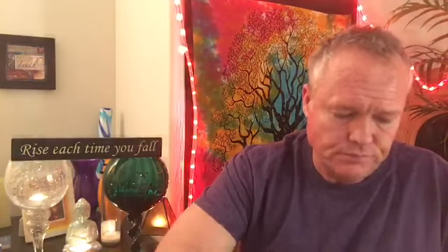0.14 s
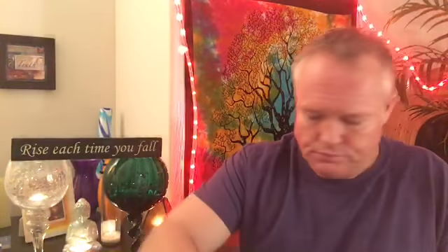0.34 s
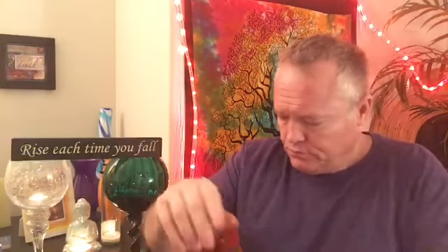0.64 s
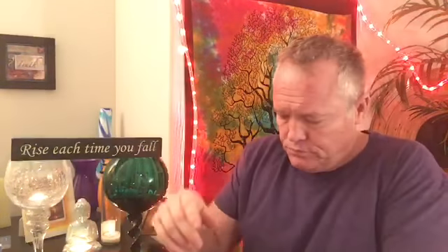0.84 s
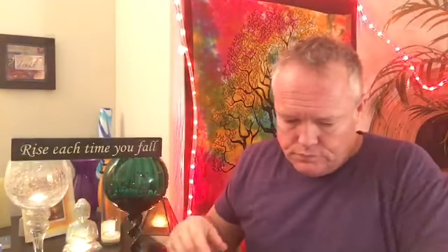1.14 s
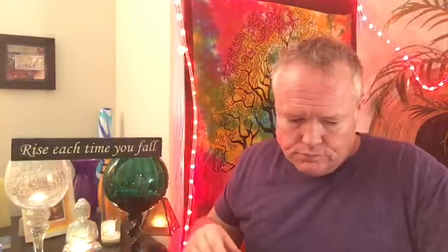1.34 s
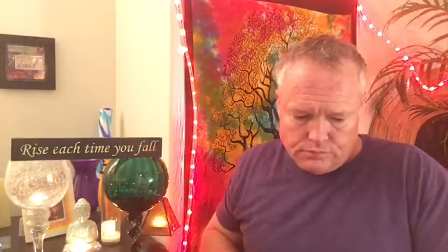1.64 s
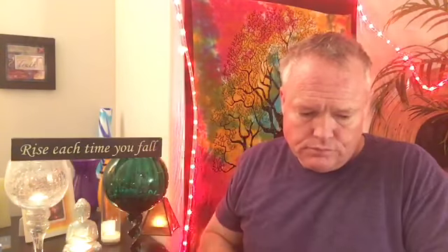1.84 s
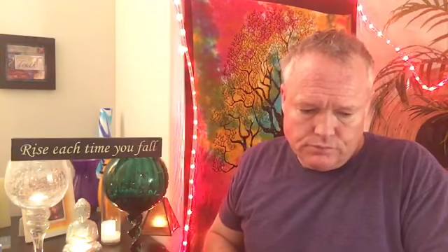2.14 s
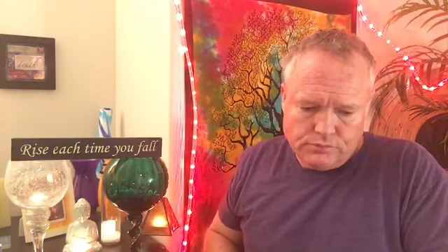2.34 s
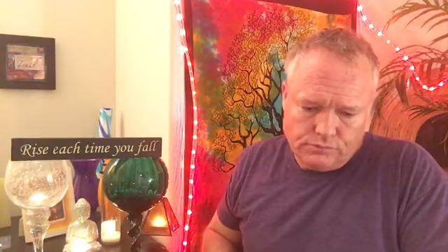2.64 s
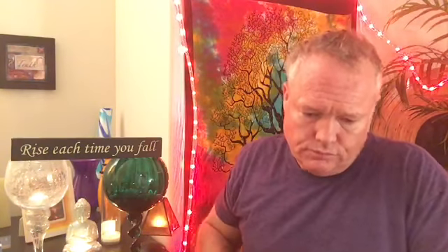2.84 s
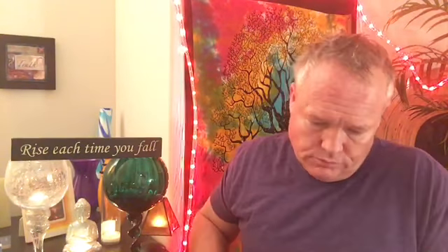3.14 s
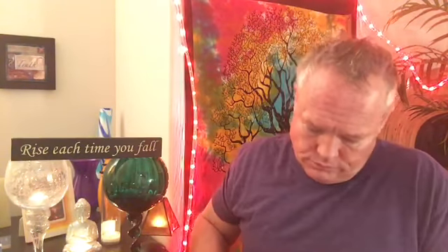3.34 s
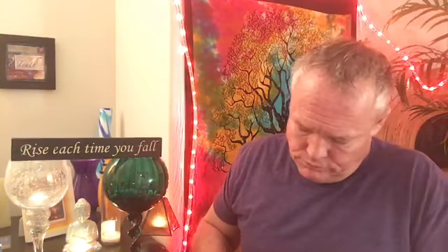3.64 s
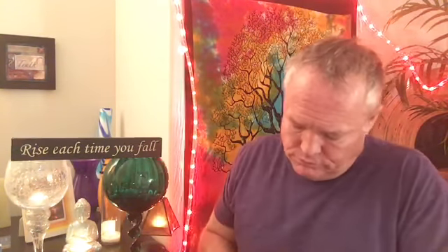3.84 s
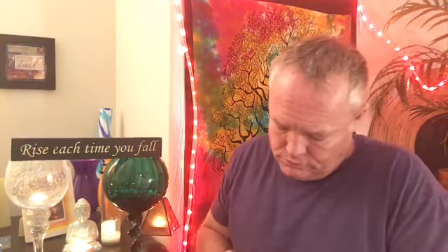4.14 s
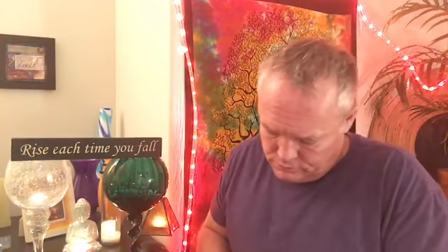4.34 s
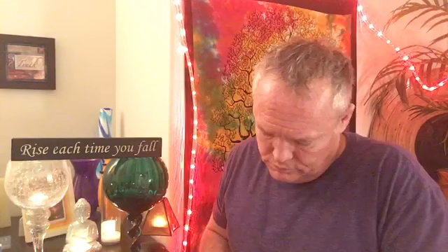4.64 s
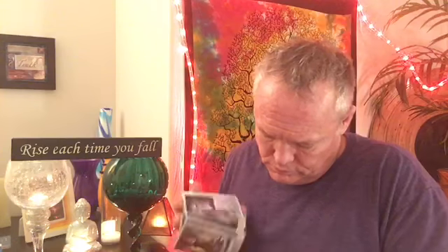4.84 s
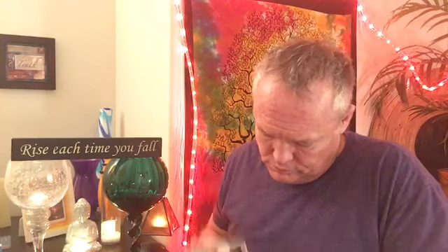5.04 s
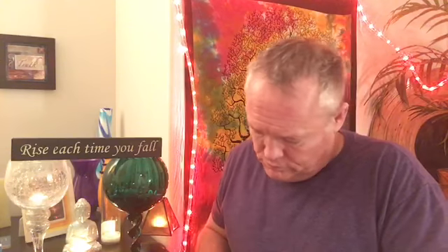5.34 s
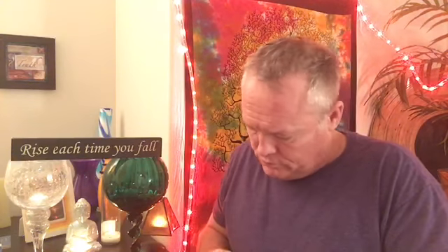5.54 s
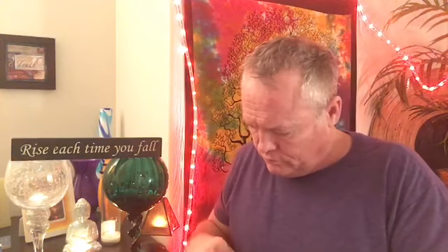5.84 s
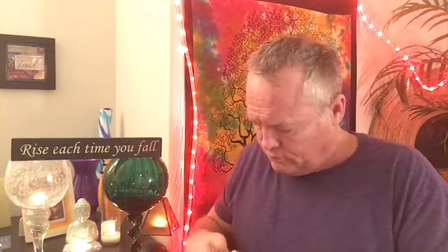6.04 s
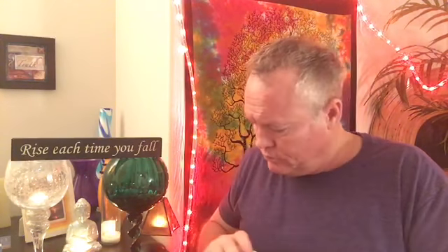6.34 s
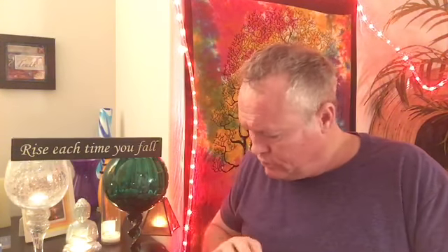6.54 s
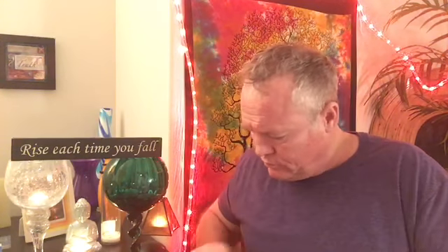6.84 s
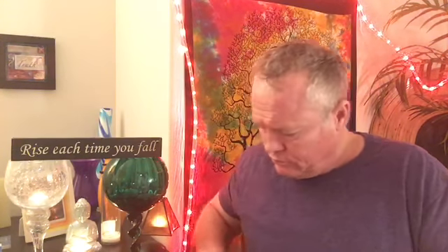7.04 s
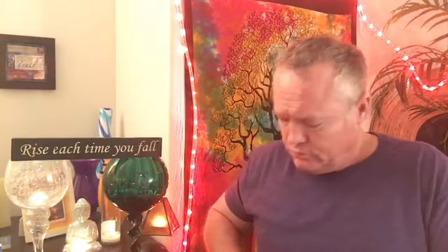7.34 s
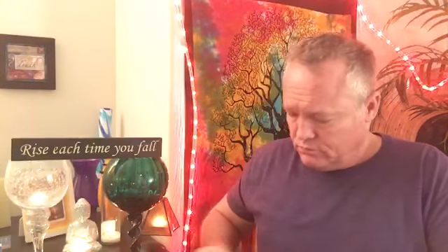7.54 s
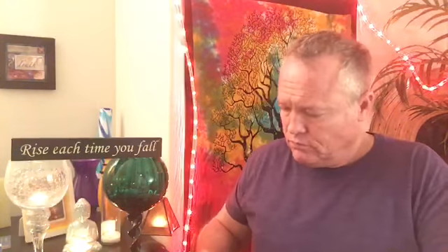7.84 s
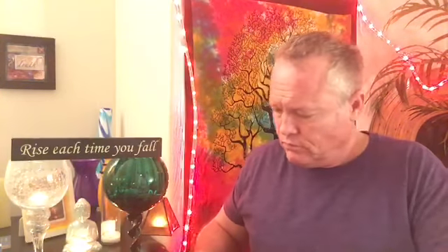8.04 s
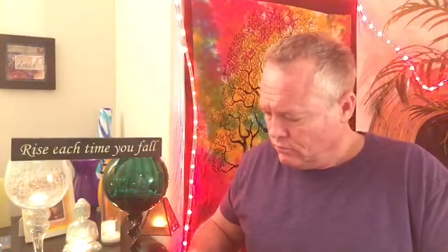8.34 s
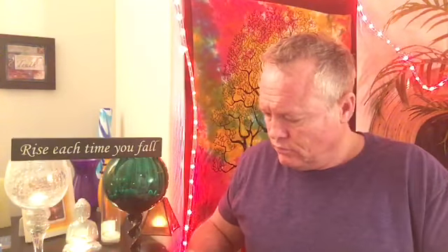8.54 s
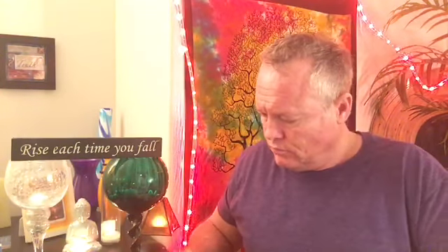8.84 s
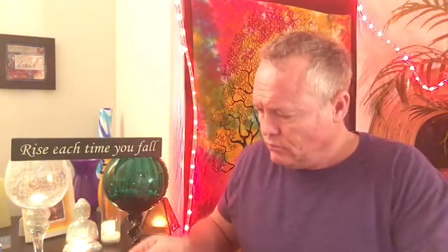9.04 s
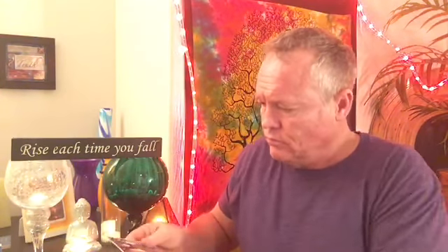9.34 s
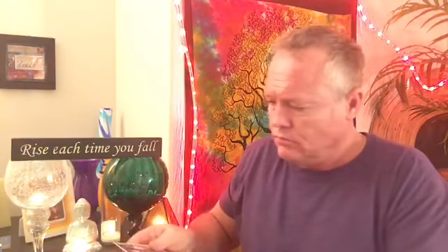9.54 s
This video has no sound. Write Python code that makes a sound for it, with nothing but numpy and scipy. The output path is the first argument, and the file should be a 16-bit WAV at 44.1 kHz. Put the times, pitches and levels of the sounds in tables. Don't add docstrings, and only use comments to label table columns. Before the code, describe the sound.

A man's hands work a card deck: quiet rubbing, one loud slap, a snappy flurry of flips, lighter taps, then near stillness.

```python
import sys
import numpy as np
from scipy import signal
from scipy.io import wavfile
from scipy.ndimage import uniform_filter1d

SR = 44100
rng = np.random.default_rng(int(sys.argv[2]) if len(sys.argv) > 2 else 0)


def ratio_of_db(decibels):
    return 10 ** (np.asarray(decibels, float) / 20)


def store_wav(level_fs):
    pcm = np.round(np.clip(np.atleast_2d(level_fs), -1, 1) * 32767)
    wavfile.write(sys.argv[1], SR, pcm.T.astype(np.int16))


N = 427302

# (time [s], peak level [dB], body share [dB])
SNAPS = [(5.841, -38, 7), (2.2623, -34, -24), (2.3593, -30.5, 4), (3.696, -27, 6), (1.98, -31.5, 4),
         (4.9655, -29, 11), (7.481, -29.5, 5), (7.918, -30, -10), (8.096, -44, -13), (8.129, -33, -2),
         (8.243, -29.5, -2)]
SNAP_S, SNAP_EDGE_DB, SNAP_SHEEN_DB = 0.00095, -14, -32
# (time [s], peak level [dB], body share [dB], edge share [dB], length [s])
SLAPS = [(1.645, -27.5, 5, -32, 0.005), (1.65, -28, 8, -30, .003), (2.9618, -16.5, -3, -34, 0.01),
         (2.9700, -2.5, -7.5, -23, 0.0043), (2.9735, -11, -7, -10, 0.009), (2.983, -12, -9, -20, 0.0023),
         (3.382, -29, 16, -24, .003), (3.399, -21, -5, -36, 0.0048), (3.4008, -8.5, -4, -26, 0.0026),
         (3.4042, -11.5, -8, -20, .0015), (7.892, -24, -11, -38, 0.00072)]
SLAP_SHEEN_DB = -54
# (time [s], peak level [dB], body share [dB], edge share [dB], length [s])
FLIPS = [
    (5.0035, -10.5, -2, -18, 0.0016),
    (5.035, -16.5, 10, -24, .0015),
    (5.045, -9.5, 6, -32, 0.002),
    (5.083, -30, -6, -22, .001),
    (5.086, -9.5, -3, -36, 0.00063),
    (5.123, -13, -2, -22, 0.0013),
    (5.135, -17, -3, -27, 0.0017),
    (5.147, -23, -20, -18, 0.0026),
    (7.535, -27, -1, -6, 0.0046),
    (7.549, -12.5, -7.5, -21, 0.0039),
]
FLIP_SHEEN_DB = -29.5
# (frequency [Hz], level per Hz [dB])
CARD = [(250, -39.5), (600, 7.5), (1200, -2.5), (1700, -3), (2300, 3), (2650, 6), (3150, 2), (4200, -10.5),
        (6200, -25),
        (7600, -32), (8700, -26), (10500, -40), (12000, -38), (15600, -45)]
# (start [s], length [s], first level [dB], last level [dB], body share [dB])
RIFFLES = [
    (1.548, .097, -41, -38, -9),
    (5.01, .045, -21, -24, 5.5),
    (5.06, 0.08, -21, -43, 0),
    (5.14, 0.06, -35, -56, -18),
    (7.527, 0.0284, -34, -19.5, -11),
]
RIFFLE_EDGE_DB, RIFFLE_SHEEN_DB = -23, -27
# (time [s], peak level [dB], favoured pitch [Hz], rise [s])
THUMPS = [(0.348, -28.5, 286, 0.012), (0.989, -25, 156, 0.0067), (1.021, -23.5, 254, 0.011),
          (1.05, -37, 140, 0.008), (1.096, -22.5, 269, 0.0054), (1.26, -31.5, 143, 0.0071),
          (1.396, -28.5, 148, 0.012), (1.651, -18.5, 228, 0.0061), (2.693, -29.5, 219, 0.05),
          (2.797, -28, 210, 0.029), (2.976, -4.5, 151, 0.0067), (3.168, -27, 153, 0.0045),
          (3.385, -16, 217, 0.0056), (3.401, -10, 164, 0.011), (3.429, -10, 152, 0.0019),
          (3.69, -23, 252, 0.033), (4.964, -28.5, 227, 0.0066), (5.009, -16, 243, 0.008),
          (5.087, -10, 223, 0.0022), (5.11, -12, 160, 0.0036), (5.216, -22.5, 172, 0.0074),
          (7.374, -25, 163, 0.024), (7.491, -24.5, 158, 0.0033), (7.551, -16, 360, 0.0027),
          (7.892, -23.5, 229, 0.041), (8.088, -24.5, 213, 0.015), (8.146, -20.5, 214, 0.049),
          (8.777, -33, 231, 0.008)]
# (time [s], peak level [dB], favoured pitch [Hz], rise [s])
KNOCKS = [
    (1.654, -29.5, 474, 0.0028),
    (2.972, -5.5, 554, .004),
    (2.987, -13.5, 480, 0.0072),
    (3.403, -9.5, 545, 0.0037),
    (3.693, -20, 460, 0.0031),
    (5.087, -12, 700, 0.0016),
    (7.553, -19, 760, 0.0017),
]
# (frequency [Hz], level [dB], t60 [s])
TABLE = [(96.5, -11.5, 0.42), (151.7, -1.5, 0.19), (204.7, 0.5, 0.11), (246.5, -3, 0.097), (295, -2.5, .12),
         (368.2, -3, 0.1), (462.2, -2, 0.077), (522.5, -4, 0.073), (611.7, -13.5, 0.19), (700, -16.5, 0.12),
         (772.4, -8.5, 0.14)]
# (start [s], length [s], hiss level [dB], rumble level through the table [dB])
RUBS = [(0.883, .2, -47.5, -43.5), (1.096, 0.46, -43.5, -48.5), (1.57, 0.133, -40, -42),
        (1.717, 0.07, -43, -48), (1.83, 0.6, -40.5, -66), (2.544, 0.027, -42.5, -66),
        (2.655, 0.18, -53, -55), (3.749, 0.29, -42.5, -44), (4.887, 0.16, -45, -60),
        (5.31, 0.27, -41.5, -54), (5.584, 0.12, -42, -47), (5.697, 0.26, -46, -49.5),
        (5.966, 0.31, -48, -49.5), (7.213, 0.24, -47, -45.5), (7.45, 0.093, -44, -56),
        (7.684, .15, -49, -41), (7.853, 0.17, -48, -43), (8.058, 0.088, -42, -44), (8.24, .04, -42, -58)]
STROKE_EDGES, STROKE_SAG_DB = 0.19, 0.5
# (time [s], peak level [dB], frequency [Hz], length [s])
PIPS = [(0.25, -37.5, 700, 0.012), (0.259, -42, 1420, 0.0069), (.632, -41, 1620, 0.012),
        (1.016, -41, 787, 0.023), (1.338, -46, 950, 0.0077), (2.361, -27.5, 1030, 0.0026),
        (2.9705, -12, 3210, 0.0038), (2.976, -12, 3450, 0.0072), (3.403, -28, 3930, 0.0076),
        (5.015, -16.5, 1109, 0.026), (5.039, -13, 1364, 0.013), (5.404, -44, 710, 0.0089),
        (5.659, -38.5, 688, 0.016), (6.105, -37.5, 1414, 0.0091), (6.464, -42, 606, .015),
        (7.317, -34.5, 590, 0.0084), (7.552, -17.5, 1432, 0.0084), (7.554, -19.5, 1173, .007),
        (7.553, -24.5, 703, 0.01), (7.55, -18, 2860, 0.003), (3.404, -22.5, 1565, 0.011),
        (3.41, -21, 2460, 0.0144), (7.555, -22, 366, 0.011), (7.817, -43, 950, 0.018),
        (7.8933, -19, 3190, 0.0012), (7.893, -29, 1300, 0.0044), (7.985, -36.5, 1260, .004),
        (8.756, -47, 1484, .018), (9.392, -41, 1450, 0.01), (9.486, -29, 615, 0.007)]
# (time [s], peak level [dB], frequency [Hz])
FLICKS = [(.194, -31.5, 2150), (0.2934, -37, 2650), (0.419, -33.5, 2640), (.595, -38, 3020),
          (0.823, -38, 2730), (1.336, -37, 2250), (1.8422, -32, 2050), (1.943, -35.5, 2930),
          (2.0343, -35, 2900), (2.0812, -31, 2900), (2.391, -39, 2670), (3.5887, -32.5, 2500),
          (3.9, -36, 2630), (5.619, -35, 2900), (6.185, -34.5, 2230), (6.4443, -37, 2280),
          (7.892, -24, 2320), (8.736, -37, 2290)]
FLICK_S, PIP_GLIDE = 0.0035, 0.069
# (time [s], room share [dB])
REACH = [(0, -4), (2.9, -0.5), (3.4, -2), (4.9, -4), (5.12, 0), (7.5, -5), (7.9, -0.5), (9.7, 0)]
# (frequency [Hz], t60 [s])
ROOM = [(100, 0.043), (260, 0.54), (700, 0.34), (1840, 0.31), (4850, 0.19)]
SHARP = .1555, .3, [1, 16, 20, 21, 22, 23, 27, 29, 31], [0, 7, 8, 10, 12, 14, 21.5, 24, 25, 26]
DULL = .1075, .1024, [0, 6, 26, 46, 50, 56, 58, 70, 82, 88], [2, 8, 11, 23, 40, 41, 43, 75.94, 78, 84, 90]
SHARP_DB, SHARP_RING_DB, DULL_DB, DULL_RING_DB, WEAK_DB = -41, 8.5, -41.5, 11, -4
# (frequency [Hz], width [Hz], level [dB])
FAN = [(54.6, 8.3, -57.5), (101.8, 13, -54.5), (233.2, 4.7, -51.5), (315.5, 23, -53.5), (355, 11.5, -59.5),
       (606, 51, -59), (2380, 300, -61.5), (2900, 320, -58.5)]
# (frequency [Hz], level per Hz [dB])
AIR = [(20, -27), (45, -10.5), (130, -4), (300, -4.5), (450, -10.5), (1250, -19.5), (2600, -17.5),
       (3400, -26), (4400, -33), (6600, -32.5), (9500, -40), (10500, -44.5), (11500, -42), (15700, -45.5)]
AIR_DB = -46
WHINE_GAPS = .50, .989
WHINE_HZ, WHINE_DB = 3450, -66


def evened(x):
    return x / np.sqrt(np.mean(x ** 2) + 1e-20)


def read(points, hz):
    f, value = np.transpose(points)
    return np.interp(np.log(hz + 1), np.log(f + 1), value)


def add(mix, s, sound):
    part = mix[round(s * SR):][:len(sound)]
    part += sound[:len(part)]


def band(x, lo_hz, hi_hz, order=2):
    return signal.sosfilt(signal.butter(order, [lo_hz, hi_hz], "band", fs=SR, output="sos"), x)


def resonate(x, hz, width):
    r = np.exp(-np.pi * width / SR)
    return signal.lfilter([1 - r], [1, -2 * r * np.cos(2 * np.pi * hz / SR), r * r], x)


def card_colour(drive, body_db, edge_db, sheen_db):
    level_db = np.maximum(read(CARD, abs(np.fft.fftfreq(2048, 1 / SR))), -100)
    log_gain = np.log(ratio_of_db(level_db))
    phase = -signal.hilbert(log_gain).imag
    taps = np.fft.ifft(np.exp(log_gain + 1j * phase)).real[:1024]
    x = signal.oaconvolve(drive, taps)[:len(drive)]
    body = evened(band(x, 650, 1880))
    crack = evened(band(x, 1650, 6000))
    edge = evened(band(x, 4600, 8160))
    sheen = evened(band(x, 8000, 19000, order=4))
    return crack - ratio_of_db(body_db) * body - ratio_of_db(edge_db) * edge + ratio_of_db(sheen_db) * sheen


def crackle(count, per_s, spread_db):
    sign_and_size = rng.standard_normal(count)
    uneven = ratio_of_db(spread_db * rng.exponential(1, count).clip(0, 4))
    return sign_and_size * uneven * (rng.random(count) < per_s / SR)


def snaps():
    near, far = np.zeros(N), np.zeros(N)
    t = np.arange(1600) / SR
    impulse = 1. * (t == 0)
    rows = [(s, db, body_db, length, edge_db, SLAP_SHEEN_DB) for s, db, body_db, edge_db, length in SLAPS]
    rows += [(s, db, body_db, length, edge_db, FLIP_SHEEN_DB) for s, db, body_db, edge_db, length in FLIPS]
    rows += [(*row, SNAP_S, SNAP_EDGE_DB, SNAP_SHEEN_DB) for row in SNAPS]
    noises = rng.standard_normal((len(rows), len(t)))
    for (s, db, body_db, length, edge_db, sheen_db), noise in zip(rows, noises):
        u = t / length
        burst = noise * np.exp(-u) * (1 - np.exp(-5.0 * u))
        crack = card_colour(burst, body_db, edge_db, sheen_db)
        size = ratio_of_db(db + 0.5) / abs(crack).max()
        add(near, s, size * crack)
        add(far, s, size * card_colour(impulse, body_db, edge_db, sheen_db))
    return near, far


def riffle():
    out, clicks = np.zeros(N), crackle(N, 3000, 2.1)
    for s, length, first_db, last_db, body_db in RIFFLES:
        count = round(length * SR)
        run = card_colour(clicks[round(s * SR):][:count], body_db, RIFFLE_EDGE_DB, RIFFLE_SHEEN_DB)
        swell = ratio_of_db(np.linspace(first_db, last_db, count) - 9.5)
        add(out, s, swell * run * signal.windows.tukey(count, .15))
    return out


def thumps():
    out, t = np.zeros(N), np.arange(SR // 3) / SR
    blows = THUMPS + KNOCKS
    hz, db, t60 = np.transpose(TABLE)[..., None]
    chance = rng.random((len(blows), 2, len(TABLE), 1))
    for (s, peak_db, spot_hz, rise), (detune, phase) in zip(blows, chance):
        near_db = -9.0 * abs(np.log2(hz / spot_hz))
        mode_hz = hz * (1 + 0.05 * (detune - .5))
        modes = ratio_of_db(db + near_db - 60 * t / t60) * np.sin(2 * np.pi * (mode_hz * t + phase))
        ring = modes.sum(0) * (1 - np.exp(-t / rise))
        add(out, s, ratio_of_db(peak_db - 4.5) * ring / abs(ring).max())
    return out


def rubs():
    clumps = ratio_of_db(3.5 * evened(uniform_filter1d(rng.standard_normal(N), 700)))
    grit = evened(clumps * crackle(N, 6000, 2.2))
    low = evened(sum(ratio_of_db(db) * evened(resonate(grit, hz, 2.0 / t60)) for hz, db, t60 in TABLE))
    hiss = card_colour(grit, -2, -40.0, -22)
    press = np.zeros((N, 2))
    for s, length, hiss_db, low_db in RUBS:
        count = round(length * SR)
        stroke = signal.windows.tukey(count, STROKE_EDGES) * ratio_of_db(np.linspace(0, STROKE_SAG_DB, count))
        add(press, s, stroke[:, None] * ratio_of_db([hiss_db - 15, low_db - 6.0]))
    return press[:, 0] * hiss + press[:, 1] * low


def pips():
    out, t = np.zeros(N), np.arange(SR // 8) / SR
    for s, db, hz, length in PIPS + [(*row, FLICK_S) for row in FLICKS]:
        u = t / max(length, .0015)
        shape = 2 * np.e * u * np.exp(-2 * u)
        cycles = hz * np.cumsum(1 + PIP_GLIDE * (u - .5)) / SR
        add(out, s, ratio_of_db(db - 5) * shape * np.sin(2 * np.pi * cycles))
    return out


def fidget():
    grains = crackle(N, 140, 1.5)
    grain_noise = rng.standard_normal(90) * np.hanning(90)
    creaks = signal.oaconvolve(grains, grain_noise)[:N]
    return ratio_of_db(-70.5) * card_colour(creaks, 2.5, -24, -32)


def room(x):
    out, now = np.zeros(N), np.arange(N) / SR
    x = x * ratio_of_db(np.interp(now, *np.transpose(REACH)))
    for k in range(3):
        taps = np.zeros(SR // 2)
        at = np.arange(120, len(taps) - 20, 20)
        taps[at + rng.integers(0, 20, len(at))] = rng.choice([-1., 1.], len(at))
        hz, t, z = signal.stft(taps, SR, nperseg=256)
        clumps = evened(uniform_filter1d(uniform_filter1d(rng.standard_normal(z.shape), 4, 0), 3, 1))
        fall_db = 60 * t / read(ROOM, hz)[:, None]
        decay = ratio_of_db(-fall_db) + ratio_of_db(-22.5 - 0.3 * fall_db)
        tail = signal.istft(z * ratio_of_db(3.0 * clumps) * decay, SR, nperseg=256)[1]
        turn = np.sqrt(2 / 3) * np.cos(np.pi * (now * 2.3 + k / 3))
        out += signal.oaconvolve(x * turn, tail / np.linalg.norm(tail))[:N]
    return out


def ticks():
    click, ring = np.zeros(N), np.zeros(N)
    tick_series = (SHARP, SHARP_DB, SHARP_RING_DB, .6), (DULL, DULL_DB, DULL_RING_DB, 0)
    for (first, period, strong, weak), top_db, ring_db, lead in tick_series:
        for beat in strong + weak:
            s = first + beat * period
            db = top_db + WEAK_DB * (beat in weak) + rng.standard_normal()
            add(click, s + 0.00059, ratio_of_db([db]))
            add(click, s - .0035, lead * ratio_of_db([db]))
            add(ring, s + 0.001007, ratio_of_db([db + ring_db]))
            add(ring, s + 0.00247, ratio_of_db([db + ring_db]))
    rung = resonate(ring, 2400, 460) + resonate(ring, 2600, 310)
    return ratio_of_db(12.0) * band(click, 3400, 8000) + ratio_of_db(15.0) * band(rung, 1300, 4900)


def fan_wash():
    frames, hz = N // 256 + 5, np.fft.rfftfreq(1024, 1 / SR)
    a, b, patches = rng.standard_normal((frames, 513, 3)).T
    patches = evened(uniform_filter1d(uniform_filter1d(patches, 10, 0), 12, 1))
    patch_db = 3.1 * patches / (1 + (hz[:, None] / 4000) ** 2)
    z = (a + 1j * b) * ratio_of_db(read(AIR, hz)[:, None] + patch_db)
    return ratio_of_db(AIR_DB - 2.0) * evened(signal.istft(z, nperseg=1024, noverlap=768)[1][:N])


def fan_hum():
    hum = np.zeros(N)
    for hz, width, db in FAN:
        tone = resonate(rng.standard_normal(N), hz, width)
        hum += ratio_of_db(db) * evened(band(tone, 0.67 * hz, 1.193 * hz, order=1))
    return hum


def whine():
    t = np.arange(N) / SR
    first, period = WHINE_GAPS
    cycle = (t - first) / period
    gate = 1 - 1.3 * np.exp(-((cycle - np.round(cycle)) / .022) ** 2)
    return ratio_of_db(WHINE_DB + 4.5) * gate * np.sin(2 * np.pi * WHINE_HZ * t)


def scene():
    near, far = snaps()
    run, table = riffle(), thumps()
    small = rubs() + pips() + fidget()
    wet = room(ratio_of_db(2.0) * far + ratio_of_db(-4.5) * run + ratio_of_db(-4.0) * small + ratio_of_db(-12.5) * table)
    laptop = ticks() + fan_wash() + fan_hum() + whine()
    return (near + run + small + table + wet + laptop)[None]


def roll_off(x):
    return signal.sosfilt(signal.butter(12, 16460, fs=SR, output="sos"), x)


def record(dry):
    held = 1.2 * np.tanh(dry / 1.2)
    low_pass = signal.firwin(801, 15720, window=("kaiser", 9), fs=SR)
    finished = signal.oaconvolve(held, low_pass[None], "same")
    return roll_off(finished)


dry = scene()
out = record(dry)
store_wav(out)
```